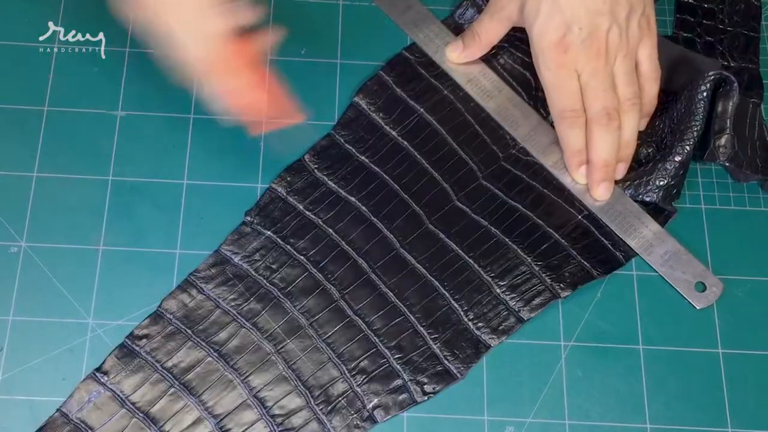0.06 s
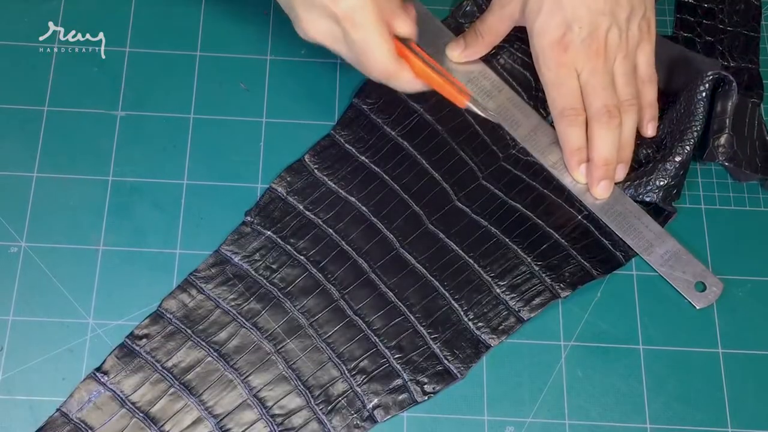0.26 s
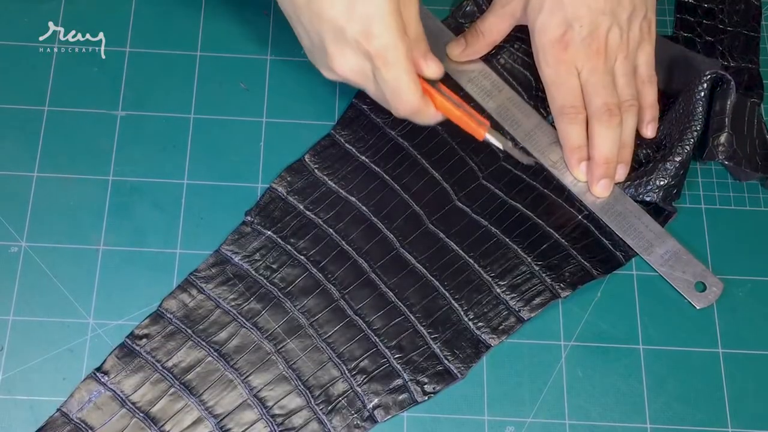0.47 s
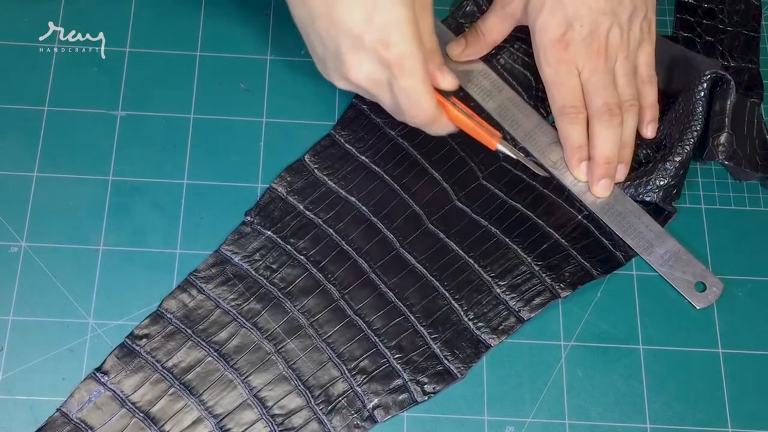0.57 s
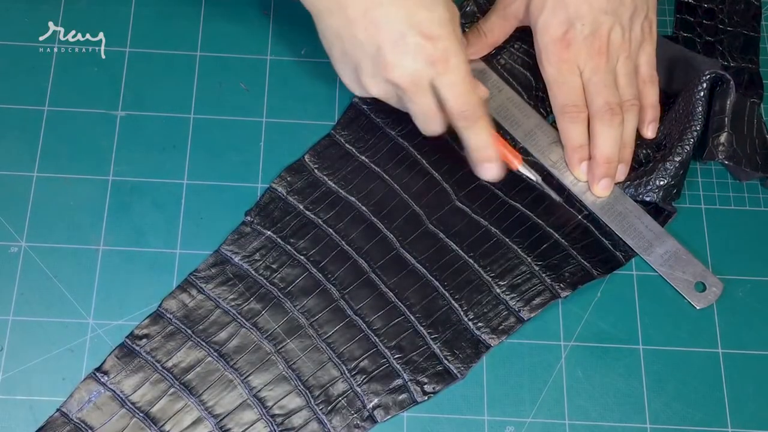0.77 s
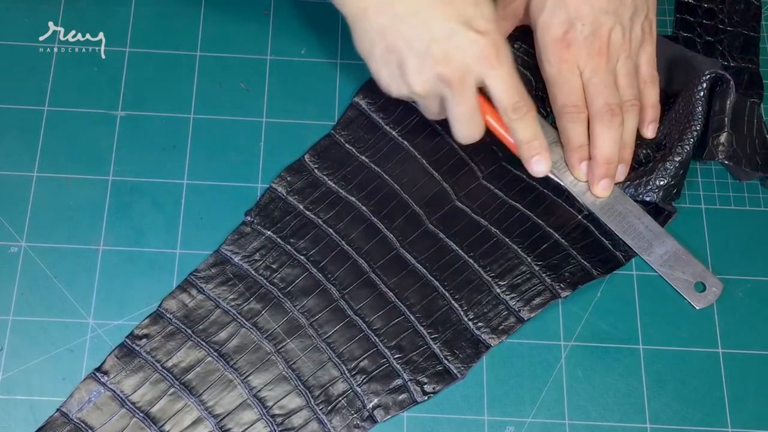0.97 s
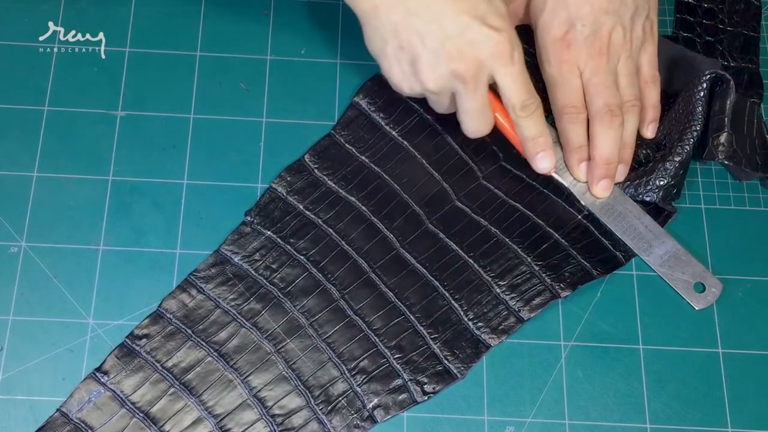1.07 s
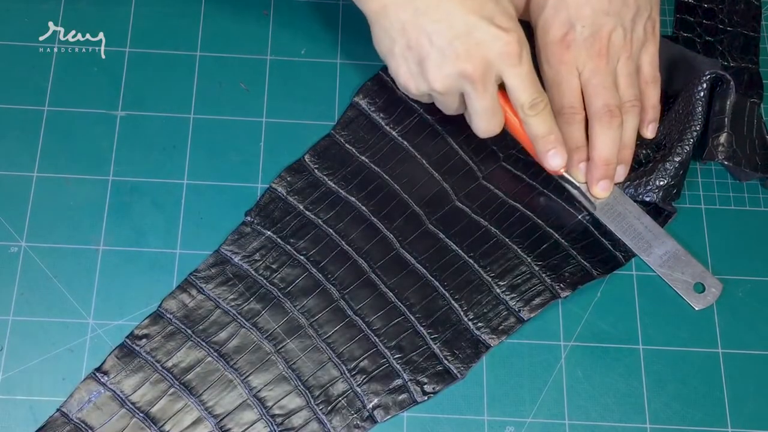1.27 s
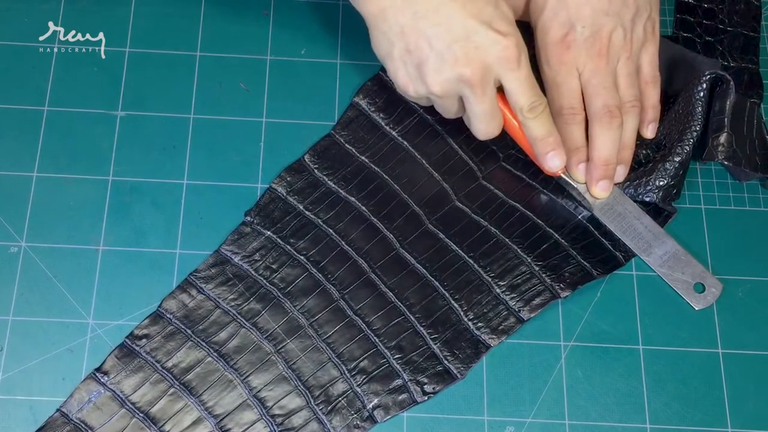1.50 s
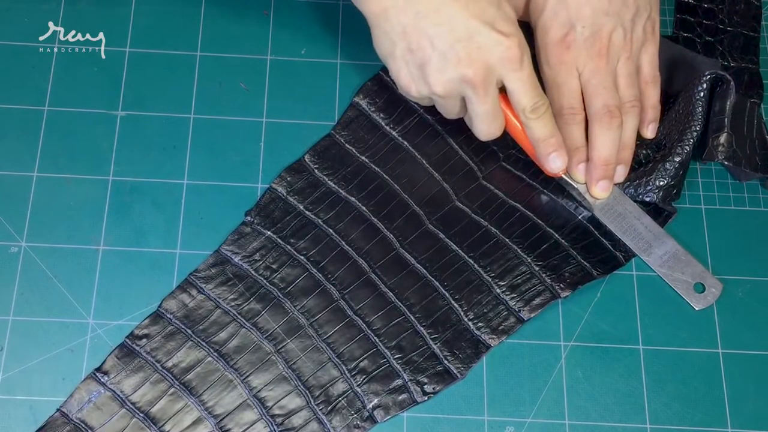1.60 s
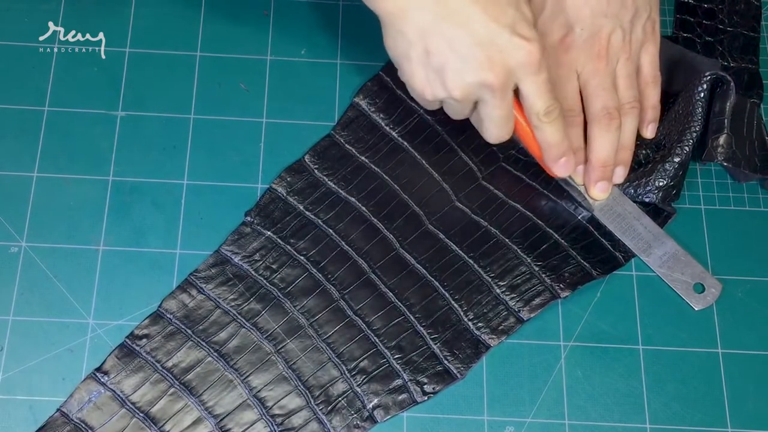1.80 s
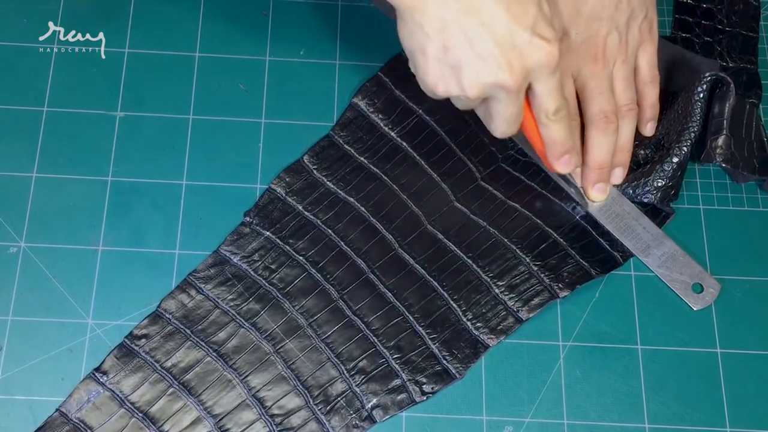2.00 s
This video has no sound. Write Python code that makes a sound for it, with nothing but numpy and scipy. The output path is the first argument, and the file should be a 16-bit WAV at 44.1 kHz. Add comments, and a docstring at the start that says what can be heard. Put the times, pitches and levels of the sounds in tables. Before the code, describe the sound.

A craft knife blade is pushed out in a quick run of sharp, rattling clicks. It ticks lightly against a steel ruler, then starts a soft cut through leather, close by in a quiet workroom.

```python
"""A quiet workroom, with ventilation humming faintly: a craft knife is readied over a cutting mat.
A thumb rasps on the slider and pushes the blade out through ten ratchet notches, each a crack with
a short rattle and ring of handle and spring. The blade ticks against a steel ruler, then is drawn
along it through leather, catching on the ridges of the hide and knocking the bench."""
import sys
import numpy as np
from scipy import signal
from scipy.fft import rfft, irfft
from scipy.io import wavfile

SR = 44100
rng = np.random.default_rng(int(sys.argv[2]) if len(sys.argv) > 2 else 0)


def digitize_waveform(pressure):
    """Quantize a signal to 16-bit integers and store it at the path in sys.argv[1].

    Rows of a 2-D input are taken as channels; values are limited to [-1, 1].
    """
    field = np.atleast_2d(pressure).T
    bounded = np.clip(field, -1, 1)
    quanta = np.round(bounded * 32767).astype(np.int16)
    wavfile.write(sys.argv[1], SR, quanta)


N = 90404
T = np.arange(N) / SR

# The slider drops into each notch; the resonances shift as the blade comes out: t/s, crack level/dB,
# steel rattle level/dB, handle rattle level/dB, then f/Hz, level/dB for each of
# low handle mode, high handle mode and spring
NOTCHES = [ (0.2382, -21.5, -22, -31.5, 3150, -33.5, 3900, -38.5, 5800, -16),
           (0.253, -26.5, -24.5, -22.5, 2320, -36, 3850, -27.5, 5780, -17.5),
           (0.2704, -23.5, -27.5, -29.5, 3650, -19.5, 4060, -23, 5900, -17.5),
           (0.2897, -32, -21.5, -26, 3130, -59.5, 3760, -49.5, 5910, -22),
           (.3215, -22, -26, -32.5, 2480, -32.5, 3050, -40, 5780, -22),
           (0.3754, -19.5, -38, -36, 2650, -31, 4000, -36, 5660, -23),
           (0.4079, -28.5, -21, -33, 2780, -35.5, 4020, -24, 5506, -22),
           (.4386, -27.5, -22, -32, 2857, -24, 4700, -40, 5600, -22),
           (0.5297, -25, -20.5, -35, 2814, -19.5, 3420, -20.5, 5420, -24.5),
           (0.6073, -18.5, -25.5, -34, 3300, -23.5, 3790, -18.5, 5540, -19)]
# The slider rebounds on its last, firm steps: t/s, level/dB
REBOUNDS = [(0.5317, -27), (0.6094, -24)]
HANDLE_RISE_S = 0.0011


def from_db(db):
    """Decibels to gain."""
    return 10 ** (np.asarray(db) / 20)


def noise(colour, bands=()):
    """Noise of rms 1, shaped by a colour curve and resonant bands."""
    hz, db = np.transpose(colour)
    f = np.fft.rfftfreq(N, 1 / SR) + 1e-9
    shape_db = np.interp(np.log(f), np.log(hz), db)
    shape_db += sum(boost / (1 + (2 * (f - centre) / width) ** 2) for centre, width, boost in bands)
    x = irfft(rfft(rng.standard_normal(N)) * from_db(shape_db), N)
    return x / x.std()


def level(curve):
    """A fader ride through points of t/s, level/dB."""
    return from_db(np.interp(T, *np.transpose(curve)))


def blow(s, db, t60, rise=.0001):
    """Impact envelope starting at time s: quick attack, exponential decay."""
    age = np.maximum(T - s, 0)
    return (1 - np.exp(-age / rise)) * from_db(db - 60 * np.minimum(age / t60, 4))


def ring(s, db, hz, t60, rise):
    """One struck mode."""
    return blow(s, db, t60, rise) * np.sin(2 * np.pi * hz * (T - s))


def burst(x, envelope):
    """Noise under an envelope, with the envelope's energy."""
    return x * envelope * np.linalg.norm(envelope) / (np.linalg.norm(x * envelope) + 1e-12)


def grain(rough_db, per_s):
    """A random flutter in gain, of rms 1, like the uneven grip of a rubbing contact."""
    steps = rng.standard_normal(N)
    gain = from_db(rough_db * np.interp(T * per_s, np.arange(N), steps))
    return gain / np.sqrt(np.mean(gain ** 2))


def background():
    """Ventilation with a wavering hum, and a dull rumble under the handling."""
    air_colour = [(15, -88), (25, -30), (41, -14.5), (61, 0.5), (113, -4), (140, -5.5), (173, -4),
                  (762, -15), (848, -13.5), (2630, -20), (4150, -21), (4870, -27), (6210, -24.5),
                  (8130, -28), (15500, -31)]  # ventilation air: f/Hz, level/dB
    hum_tones = [(60, -78.5), (108, -74.5)]  # ventilation hum: f/Hz, level/dB
    rumble_swells = [(0, -77), (.18, -80), (.24, -67), (.34, -67), (.41, -87), (.49, -60), (.57, -78.5),
                     (1.25, -86), (1.34, -79), (1.41, -67.5), (1.46, -81), (1.6, -77), (1.7, -81.5),
                     (2.05, -77)]  # rise and fall of the rumble: t/s, level/dB
    rumble_colour = [(25, -32.5), (45, -10), (60, -4.5), (110, -1.5), (180, -12.5), (500, -40.5),
                     (2000, -74)]  # its spectrum: f/Hz, level/dB
    hum = np.zeros(N)
    for hz, db in hum_tones:
        tone = np.sqrt(2) * np.sin(2 * np.pi * (hz * T + rng.random()))
        hum += from_db(db) * tone * grain(rough_db=5, per_s=14)
    return from_db(-70) * noise(air_colour) + hum + level(rumble_swells) * noise(rumble_colour)


def room(x):
    """Early reflections from the bench, then a short dense tail from the walls."""
    colour = [(200, 2.2), (2500, 4.1), (6000, 2.1), (10000, 0), (15500, -2.7)]  # tone of the reflections: f/Hz, level/dB
    predelay_s, wet_db = 0.0026, -11
    early = blow(predelay_s, db=4.5, t60=.05, rise=.001)
    late = blow(predelay_s, db=0, t60=.13, rise=.002)
    response = (noise(colour) * np.hypot(early, late) * grain(rough_db=1.5, per_s=1500))[:SR // 2]
    return from_db(wet_db) * signal.fftconvolve(x, response / np.linalg.norm(response))[:N]


def settling():
    """Faint dull rubbing of hand and hide on the mat."""
    moves = [(0, -82), (.026, -64), (.045, -86), (.15, -100), (1.66, -100), (1.69, -72.5), (1.75, -83),
             (1.79, -69.5), (1.83, -78), (1.865, -67.5), (1.9, -70), (1.93, -95)]  # the hand moves in, and later settles before the stroke: t/s, level/dB
    colour = [(100, -12), (250, -5.5), (370, 0.5), (520, -11), (780, -11), (1600, -13), (3000, -19.5),
              (6000, -28), (15000, -34.5)]  # soft friction on the mat: f/Hz, level/dB
    return level(moves) * noise(colour) * grain(rough_db=2, per_s=300)


def thumb():
    """Skin rasps over the ribbed slider."""
    rubs = [(0, -85), (.055, -79), (.072, -58.5), (.09, -76.5), (.108, -55.5), (.122, -46), (.135, -64),
            (.16, -97.5), (.225, -69.5), (.237, -58), (.247, -42), (.285, -44), (.33, -53.5), (.36, -66),
            (.46, -62), (.51, -76.5), (.7, -91), (.8, -110)]  # the thumb's strokes: t/s, level/dB
    colour = [(590, -73), (1000, -31.5), (2180, -12.5), (2680, -12), (4440, -7.5), (9150, -10.5),
              (10600, -19), (11600, -7.5), (15500, -13.5)]  # bright rasp of skin: f/Hz, level/dB
    return level(rubs) * noise(colour) * grain(rough_db=3, per_s=1600)


def touches():
    """Small damped ticks as knife and ruler are placed: a scratch and a brief band of ringing."""
    # Light contacts: t/s, ring level/dB, f/Hz, t60/s, rise/s, scratch level/dB
    ticks = [(.068, -71, 3280, 0.013, .002, -70), (0.792, -69, 4400, .01, 0.00025, -67),
             (0.807, -67.5, 1500, .06, .002, -84), (1.155, -60.5, 2200, 0.018, .0004, -73),
             (1.436, -68, 2860, 0.032, .001, -63.5), (1.447, -51.5, 2990, 0.037, 0.0025, -58),
             (1.4967, -44, 4030, 0.015, 0.00025, -47)]
    scratch_colour = [(1500, -14), (3000, -21), (3900, 19), (5400, -12), (6200, 8.5), (7000, -7),
                      (7500, 8.5), (8300, -13), (9200, 7), (10300, -8), (11500, -15), (14000, -16),
                      (15600, -6)]  # scratch of steel: f/Hz, level/dB
    third_octave, skirt_db = np.cbrt(2), -23
    scratch, out = noise(scratch_colour), np.zeros(N)
    for s, db, hz, t60, rise, scratch_db in ticks:
        band = noise([(hz / 2, 2 * skirt_db), (hz / third_octave, skirt_db), (hz, 0),
                      (hz * third_octave, skirt_db), (hz * 2, 2 * skirt_db)])
        out += burst(band, blow(s, db, t60, rise))
        out += burst(scratch, blow(s, scratch_db, t60, rise))
    return out


def cut():
    """Fibres part under the blade; each ridge tears with a small burst and sets the bench ringing."""
    stroke = [(1.885, -97), (1.905, -59), (1.92, -57.5), (1.945, -55), (1.98, -60), (2.0, -54.5),
              (2.03, -54), (2.05, -53)]  # the blade slices the leather: t/s, level/dB
    colour = [(45, -14.5), (100, -6), (230, 0.5), (320, -10.5), (380, 1), (510, -14.5), (740, -8.5),
              (1180, -11.5), (1340, -22), (1710, -14), (3000, -21.5), (4300, -20), (6300, -20.5),
              (7300, -28), (9500, -26.5), (12300, -30.5), (14000, -28.5), (15500, -28.5)]  # parting fibres: f/Hz, level/dB
    blade_bands = [(6280, 550, 1), (8200, 230, 7), (8490, 370, 6.5), (9300, 340, 8), (10240, 300, 4.5),
                   (11150, 400, 7.5), (13900, 1494, 3)]  # the dragged blade rings in the scrape: f/Hz, width/Hz, boost/dB
    ridges = [(1.917, -56.5), (1.932, -54.5), (1.956, -49.5), (1.987, -47.5), (2.015, -48)]  # the blade catches on the hide: t/s, level/dB
    bench_modes = [(108, -1, 0.044), (207, 0, 0.047), (252, 0.5, 0.071), (388, -0.5, 0.096),
                   (740, -7, 0.046), (1010, -25.5, 0.027), (1730, -21.5, .02)]  # resonances of the bench: f/Hz, level/dB, t60/s
    force, knocks = level(stroke), np.zeros(N)
    for s, db in ridges:
        force += blow(s, db + 0.5, t60=0.052, rise=0.0022)
        for hz, mode_db, t60 in bench_modes:
            polarity = rng.choice([-1, 1])
            knocks += polarity * ring(s, db + mode_db + rng.normal(0, 1.4), hz, t60, rise=0.0009)
    return force * noise(colour, blade_bands) * grain(rough_db=2, per_s=900) + knocks


def knife_ring():
    """Handle and spring ring briefly after each notch; a rebound knocks the whole handle."""
    spring_modes = [(1, 1), (.96, -10), (1.085, -9)]  # the spring's cluster: ratio to its main pitch, level/dB
    handle_t60_s = 0.018
    out = sum(ring(s, db - 26, hz=984.4, t60=0.024, rise=HANDLE_RISE_S) for s, db in REBOUNDS)
    for s, *_, low_hz, low_db, high_hz, high_db, spring_hz, spring_db in NOTCHES:
        out += ring(s, low_db, low_hz, handle_t60_s, HANDLE_RISE_S)
        out -= ring(s, high_db, high_hz, handle_t60_s, HANDLE_RISE_S)
        for ratio, db in spring_modes:
            out += ring(s, spring_db + db, spring_hz * ratio, t60=.014, rise=.0004)
    return out


def ratchet():
    """Each notch: a faint, very short hiss, then a crack and a short rattle of steel and plastic."""
    steel_colour = [(2500, -20.5), (4500, -5), (5700, 2), (7200, -2.5), (8200, 1.5), (9300, 0.5),
                    (10500, -6.5), (12200, 0), (13000, -2.5), (14000, -1.5), (15400, -2), (16000, -5.5)]  # bright clatter of steel: f/Hz, level/dB
    handle_colour = [(300, -14), (700, -14.5), (1000, -22.5), (1300, -11.5), (1800, -10.5), (2500, 0.5),
                     (3500, 2.5), (4500, -3), (7000, -25), (12000, -59)]  # duller clatter of the plastic handle: f/Hz, level/dB
    crack_t60_s, low_cut_hz = 0.0088, 2000
    hiss_s, hiss_db = 0.0012, -21  # just before each crack, and relative to its level
    steel, handle, out = noise(steel_colour), noise(handle_colour), np.zeros(N)
    for s, crack_db, steel_db, handle_db, *_ in NOTCHES:
        hiss_gate = (T > s - hiss_s) & (T < s)
        out += (steel + handle) * from_db(crack_db + hiss_db) * hiss_gate
        crack = blow(s, crack_db, crack_t60_s)
        rattle = blow(s, steel_db, t60=0.021)
        out += burst(steel, np.hypot(crack, rattle))
        out += burst(handle, blow(s, handle_db, t60=0.023, rise=HANDLE_RISE_S))
    for s, db in REBOUNDS:
        out += burst(steel + handle, blow(s, db, crack_t60_s))
    return signal.sosfilt(signal.butter(2, low_cut_hz, "high", fs=SR, output="sos"), out)


def scene():
    """The knife close by, in its room, in mono."""
    handling = ratchet() + thumb() + touches() + settling() + cut()
    ringing = knife_ring()
    room_send = handling + from_db(-4.5) * ringing  # the ring stays drier than the rattle
    return (handling + ringing + room(room_send) + background())[None]


def record(dry):
    """The microphone rounds the peaks, and the top end is cut steeply."""
    ceiling, high_cut_hz = 0.53, 15900
    rounded = ceiling * np.tanh(dry / ceiling)
    return signal.sosfilt(signal.ellip(10, .2, 70, high_cut_hz, fs=SR, output="sos"), rounded)


dry = scene()
out = record(dry)
digitize_waveform(out)
```